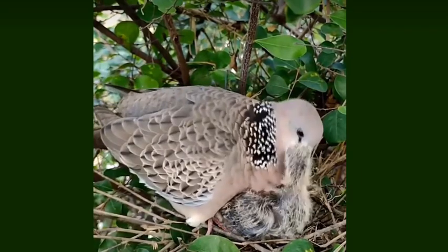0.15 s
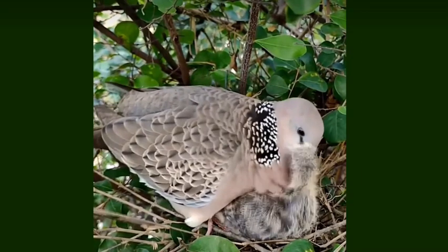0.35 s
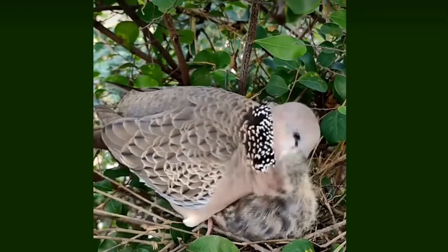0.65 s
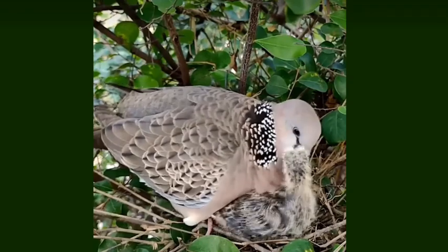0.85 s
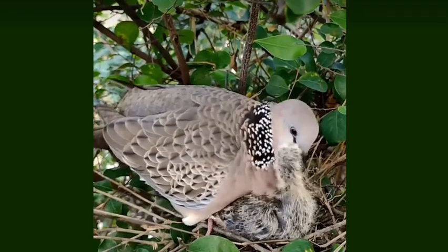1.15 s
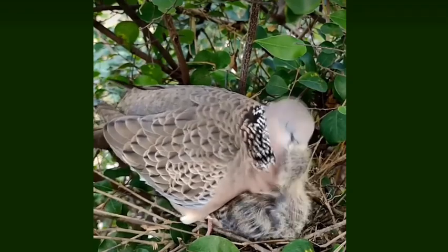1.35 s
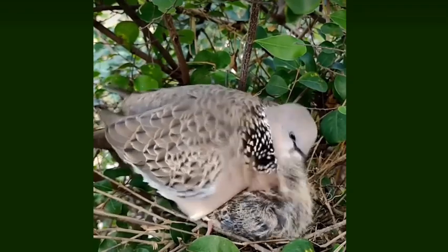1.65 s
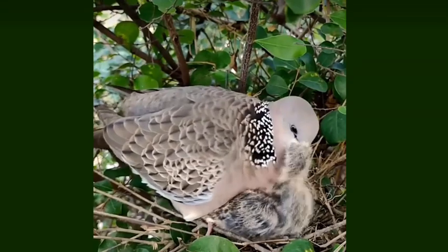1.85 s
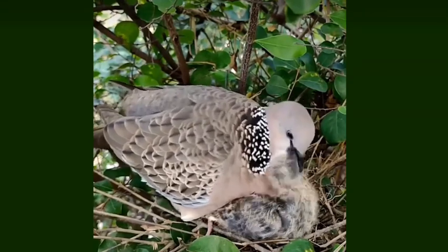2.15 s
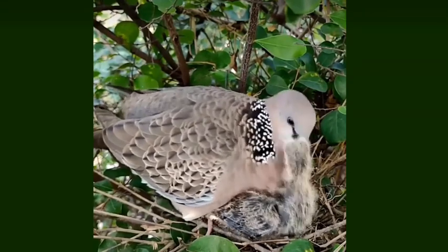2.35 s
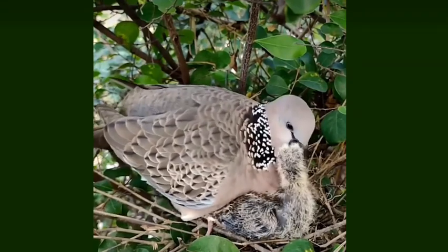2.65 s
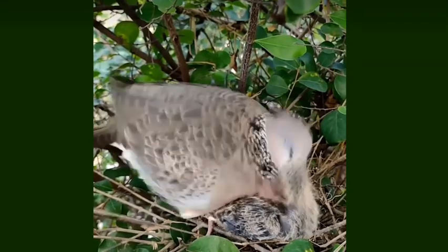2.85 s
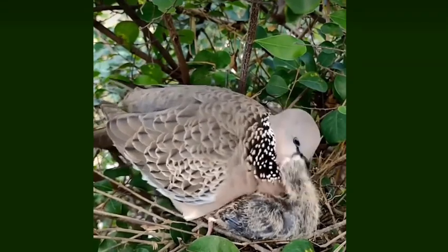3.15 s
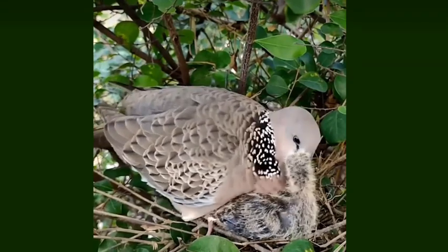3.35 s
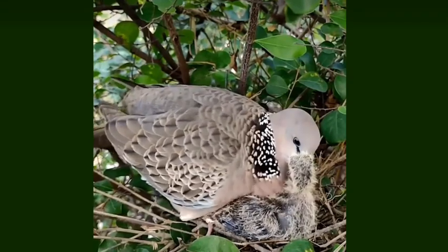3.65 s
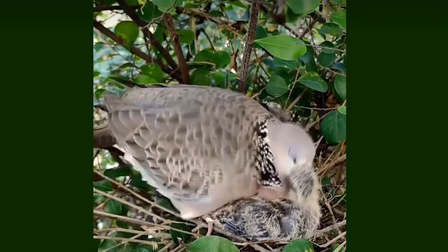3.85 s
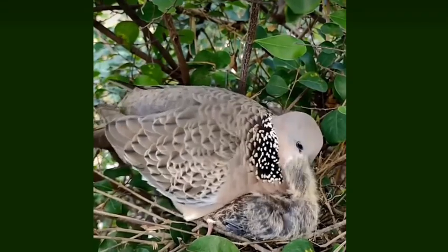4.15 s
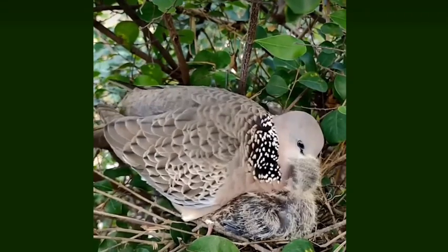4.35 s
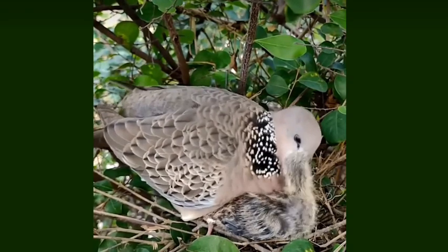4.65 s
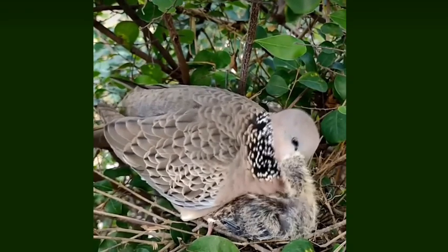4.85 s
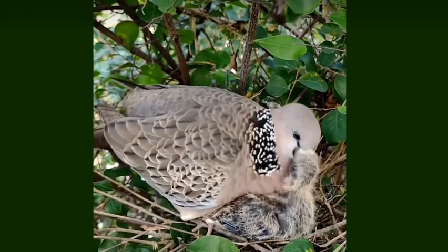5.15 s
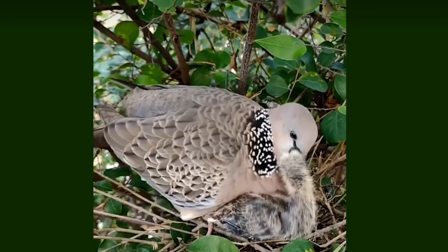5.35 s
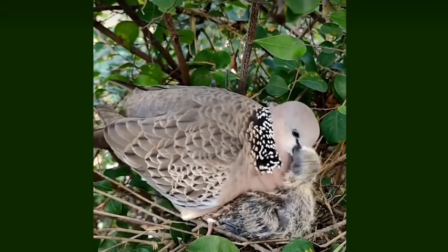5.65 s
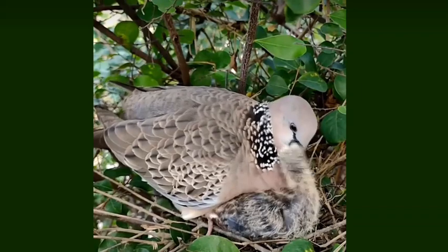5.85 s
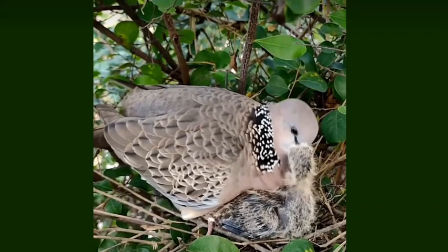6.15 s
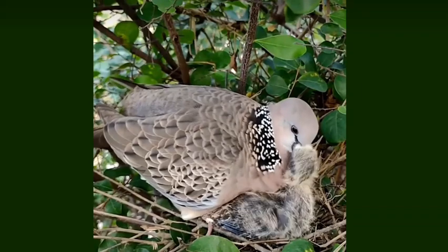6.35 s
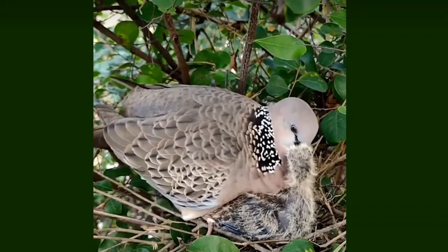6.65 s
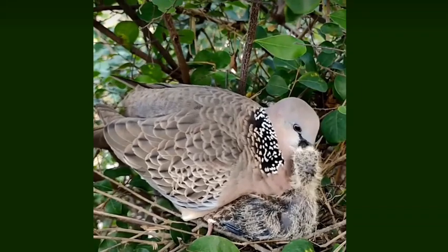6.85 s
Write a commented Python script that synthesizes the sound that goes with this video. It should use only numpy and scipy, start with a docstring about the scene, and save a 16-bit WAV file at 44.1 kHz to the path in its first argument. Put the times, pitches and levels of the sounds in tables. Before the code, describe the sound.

Several crickets shrill steadily close by in a leafy bush while a small bird gives buzzy, reedy chirps, a twig snaps, and low bumps knock the microphone.

```python
"""Several crickets shrill close by in a leafy bush where a dove feeds its chick: wing strokes ring the wings.
A small bird's reedy voice, shaped by its throat, gives buzzy chirps that swell and fade, and one squeak.
Other birds whistle in unsteady glides farther off, and one high note slurs down.
An even low patter and heavier bumps ring a few low cycles at the microphone; leaves and feathers brush
in grainy hiss; a twig snaps loudly once among fainter ticks, over low rumble and open air."""
import sys
import numpy as np
from scipy import signal
from scipy.fft import rfft, irfft, next_fast_len
from scipy.io import wavfile

SR = 44100
rng = np.random.default_rng(int(sys.argv[2]) if len(sys.argv) > 2 else 0)


def to_wav(sig):
    """Store sig (one row per channel, or 1-D mono) as 16-bit WAV at the path in sys.argv[1].

    Samples outside -1..1 are clipped; the rate is SR.
    """
    pcm = np.clip(np.atleast_2d(sig), -1, 1) * 32767
    pcm = np.round(pcm).astype(np.int16)
    wavfile.write(sys.argv[1], SR, pcm.T)  # frames by channels


N = 308687
TIME = np.arange(N) / SR
# chirps of the lowest cricket, with a long silence before the last: [t/s, length/s, relative level/dB]
LOW_CRICKET_CHIRPS = [(0.097, 0.174, -2.5), (0.429, 0.16, -1.5), (0.737, 0.17, -1.5), (1.054, 0.177, -1.5),
                      (1.395, 0.162, -0.5), (1.753, 0.14, 0), (2.047, 0.165, -1), (2.379, 0.153, -1),
                      (2.717, 0.138, -0.5), (5.473, 0.084, -3.5)]
LOW_STROKE_HZ = 116.6
# heavier bumps at the microphone, many in two flurries: [t/s, relative level/dB, nominal f/Hz]
MICROPHONE_BUMPS = [(.662, -29, 190), (1.601, -28, 195), (1.944, -24, 180), (2.031, -26, 178),
                    (2.284, -23, 174), (2.623, -28, 194), (2.711, -25.5, 171), (3.136, -30, 185),
                    (3.221, -25, 180), (3.391, -28, 186), (3.645, -27.5, 190), (4.134, -31.5, 169),
                    (4.248, -25.5, 158), (4.329, -25, 180), (4.588, -24.5, 182), (4.67, -23.5, 174),
                    (4.704, -22, 166), (4.754, -17, 171.5), (4.78, -21, 167), (4.821, -18.5, 171),
                    (4.843, -23, 171), (5.009, -27, 182), (5.093, -22.5, 180), (5.692, -21, 196),
                    (6.036, -18, 166), (6.07, -21, 174), (6.119, -17, 171), (6.147, -18.5, 165),
                    (6.191, -18.5, 179), (6.205, -15, 167), (6.232, -26, 181), (6.298, -18.5, 169),
                    (6.46, -19, 178), (6.728, -20.5, 162), (6.885, -21, 177)]


def gain_of(db):
    """Decibels to amplitude."""
    return 10 ** (np.asarray(db) / 20)


def evened(x):
    """Scales to rms 1."""
    return x / np.sqrt(np.mean(x ** 2) + 1e-20)


def read(points, hz):
    """Reads a spectrum on a log-frequency axis."""
    f, value = np.transpose(points)
    return np.interp(np.log(hz + 1), np.log(f + 1), value)


def colour(x, points):
    """Filters by a spectrum that falls away beyond its ends, then scales to rms 1."""
    size = next_fast_len(len(x))
    closed = [(points[0][0] * .8, -100), *points, (points[-1][0] * 1.2, -100)]
    gain = gain_of(read(closed, np.fft.rfftfreq(size, 1 / SR)))
    return evened(irfft(rfft(x, size) * gain, size)[:len(x)])


def wander(hz, size=N):
    """Smooth chance of about rms 1: straight lines between hz random values a second."""
    knots = rng.standard_normal(size // 20)
    return np.interp(np.arange(size) * hz / SR, np.arange(len(knots)), knots) * np.sqrt(3 / 2)


def add(mix, s, sound):
    """Mixes a sound in at time s."""
    part = mix[max(round(s * SR), 0):][:len(sound)]
    part += sound[:len(part)]


def rasp(x, share):
    """An unsteady voice: fast random tremor frays each pure line into a narrow band."""
    return x * (1 + share * wander(900)) / np.sqrt(1 + share ** 2)


def chirping(chirp_list, rise, fall, start_db):
    """Wing effort: each chirp starts a little soft, swells and stops; rise and fall in seconds."""
    effort = np.zeros(N)
    for start, length, db in chirp_list:
        t = np.arange(0, length + (rise + fall) / 2, 1 / SR)
        edges = np.minimum(t / rise, 1) * np.minimum((t[-1] - t) / fall, 1)
        add(effort, start - rise / 2, edges * gain_of(db + start_db * (1 - t / t[-1])))
    return effort


def cricket(effort, wing, level_db, stroke_hz, pulsed, unsteady, flutter_db):
    """Wing strokes pulse (the pulsed share of the power) over the scrape of file teeth; both ring the wing."""
    strokes = np.floor(np.cumsum(stroke_hz * (1 + unsteady * wander(30))) / SR)
    pulses = evened(np.diff(strokes, prepend=0))
    teeth = evened(1. * (rng.random(N) < 12000 / SR))  # 12000 random clicks a second
    clicks = np.sqrt(pulsed) * pulses + np.sqrt(1 - pulsed) * teeth
    drive = rng.choice([-1., 1.], N) * clicks
    return gain_of(level_db) * colour(drive * effort * gain_of(flutter_db * wander(45)), wing)


def loudest_cricket():
    """Chirps a little quicker than the highest one, with slow wing strokes and a gradual onset."""
    # chirps: [t/s, length/s, relative level/dB]
    mid_chirps = [(0, 0.11, 0), (0.278, 0.165, -1.5), (0.595, 0.171, 0.5), (0.906, 0.147, 0),
                  (1.195, 0.165, -0.5), (1.474, 0.18, -2.5), (1.775, 0.144, 0), (2.089, 0.15, -1),
                  (2.406, 0.12, -3.5), (2.787, 0.1, -2.5), (3.03, 0.12, -2), (3.305, 0.15, -1.5),
                  (3.606, 0.132, 0.0), (3.886, 0.165, -1.5), (4.232, 0.102, -1), (4.515, 0.174, -1.5),
                  (4.817, 0.15, -1.5), (5.121, 0.189, -1.5), (5.417, 0.16, -1), (5.74, 0.16, -0.5),
                  (6.018, 0.171, -2), (6.338, 0.168, 0), (6.643, 0.18, -0.5), (6.939, 0.054, -1.5)]
    # wing response: [f/Hz, level/dB]
    mid_wing = [(7400, -47.5), (7850, -10.5), (8150, -1), (8400, 3), (8620, 0.5), (8780, -21.5),
                (9050, -31), (9250, -67)]
    effort = chirping(mid_chirps, rise=.04, fall=0.013, start_db=-1.5)
    return cricket(effort, mid_wing, level_db=-30, stroke_hz=90.5, pulsed=.15, unsteady=0.06, flutter_db=0.55)


def highest_cricket():
    """Chirps three times a second, each stopping abruptly."""
    # chirps: [t/s, length/s, relative level/dB]
    high_chirps = [(0.119, 0.156, -1.5), (0.448, 0.189, -1.5), (0.769, 0.16, -1.0), (1.089, 0.168, -2),
                   (1.429, 0.183, 1), (1.77, 0.171, -3), (2.113, 0.162, 0.5), (2.415, 0.16, 1.5),
                   (2.749, 0.192, 0), (3.09, 0.168, 0), (3.412, 0.186, -3), (3.754, 0.18, -1),
                   (4.117, 0.147, -2), (4.432, 0.16, -0.5), (4.757, 0.189, -2), (5.1, 0.189, -1.5),
                   (5.449, 0.16, 0.5), (5.783, 0.168, -1), (6.123, 0.17, 1.5), (6.466, 0.165, -1.5),
                   (6.803, 0.15, -1.5)]
    # wing response: [f/Hz, level/dB]
    high_wing = [(7400, -45.5), (7950, -8), (8400, -2.5), (8600, -4), (8820, 2.5), (9020, -4.5),
                 (9130, -29.5), (9300, -74)]
    effort = chirping(high_chirps, rise=0.029, fall=0.0047, start_db=-2.5)
    return cricket(effort, high_wing, level_db=-32.0, stroke_hz=152, pulsed=.12, unsteady=0.035, flutter_db=0.5)


def throbbing():
    """Wing effort dips about fourteen times a second; now and then it rests longer or stresses a throb."""
    # running count of throbs: [t/s, throbs so far]
    throb_count = [(0, 0), (.279, 4), (.393, 6), (.689, 10), (1.382, 20), (1.648, 24), (2.057, 30),
                   (2.29, 33), (2.561, 37), (2.649, 38), (2.864, 41), (3.057, 44), (3.148, 45), (3.568, 51),
                   (3.784, 54), (3.948, 56), (4.065, 58), (4.148, 59), (4.347, 62), (4.72, 67), (4.83, 69),
                   (4.996, 71), (5.194, 74), (5.36, 76), (5.416, 77), (5.66, 80), (6.022, 85), (6.366, 90),
                   (6.455, 91), (6.585, 93), (6.745, 95), (7.02, 99)]
    # longer rests between runs of throbs: [t/s, nominal length/s, level change/dB]
    rests = [(1.645, 0.079, -0.5), (1.986, 0.077, -0.5), (2.293, 0.02, -13), (2.641, 0.033, -13),
             (2.931, 0.026, -3), (3.003, 0.031, -1), (3.275, 0.017, -7.5), (3.499, 0.029, -9),
             (3.843, 0.02, -11), (4.351, 0.01, -6.5), (4.989, 0.025, -11), (5.354, 0.035, -12),
             (5.66, 0.019, -6), (6.015, .044, -10.5)]
    # stressed throbs: [t/s, nominal length/s, level change/dB]
    accents = [(1.336, .04, 4), (2.789, .05, 5.5), (2.898, 0.04, 1.5), (3.314, .016, 3.5),
               (4.051, 0.023, 5.5), (4.109, 0.0094, 7), (4.333, 0.0092, 5), (4.437, .01, 3.5),
               (4.462, 0.02, 5.5), (4.67, 0.012, 3.5), (4.758, .03, 2.5), (4.957, 0.028, 3),
               (5.018, .014, 2.5), (5.1, 0.034, 3.5), (5.24, .022, 4), (5.77, .022, 3), (6.32, .016, 0),
               (6.622, 0.028, 4)]
    rest_db = -7.5
    turn = np.interp(TIME, *np.transpose(throb_count)) % 1  # position within a throb
    db = np.interp(turn, [0, .17, .27, .64, 1], [rest_db, rest_db, 0, 0, rest_db])
    for s, length, change_db in rests + accents:
        bump = signal.windows.tukey(round(length * 4 / 3 * SR), .5)
        add(db, s - length * 2 / 3, change_db * bump)
    return gain_of(db)


def throbbing_cricket():
    """A fourth cricket throbs on and on."""
    # wing response: [f/Hz, level/dB]
    throb_wing = [(6650, -67), (6850, -33.5), (7150, -21.5), (7360, 0.5), (7650, 6.5), (8100, 4),
                  (8300, -0.5), (8600, -25), (9050, -33.5), (9250, -65.5)]
    return cricket(throbbing(), throb_wing, level_db=-31, stroke_hz=126.1, pulsed=.14,
                   unsteady=0.082, flutter_db=-0.37)


def lowest_cricket():
    """Strongly pulsed chirps on a narrow wing resonance."""
    # wing response: [f/Hz, level/dB]
    low_wing = [(6500, -86), (6950, -17.5), (7120, -4), (7235, 4), (7290, -5.5), (7390, 11.5), (7480, -1.5),
                (7560, -19.5), (7900, -38.5)]
    effort = chirping(LOW_CRICKET_CHIRPS, rise=0.018, fall=0.019, start_db=-0.5)
    return cricket(effort, low_wing, level_db=-38.5, stroke_hz=LOW_STROKE_HZ, pulsed=.75,
                   unsteady=0.018, flutter_db=0.0)


def wing_ring():
    """A clear tone builds up in each chirp of the lowest cricket and trills near its wing-stroke rate."""
    ring_hz, ring_db, swell_s = 7418, -33.5, 0.033
    effort = np.zeros(N)
    for start, length, db in LOW_CRICKET_CHIRPS:
        t = np.arange(0, length, 1 / SR)
        edges = np.minimum(t / swell_s, 1) ** 2 * np.minimum((length - t) / 0.01, 1)
        add(effort, start, gain_of(db) * edges)
    stroke = 2 * np.pi * np.cumsum(LOW_STROKE_HZ * (1 + 0.025 * wander(28))) / SR
    trill = 1 + .45 * (np.cos(stroke) + np.cos(2 * stroke) / 2)
    phase = 2 * np.pi * np.cumsum(ring_hz * (1 + .0012 * wander(60))) / SR
    return gain_of(ring_db + 1.8 * wander(50)) * effort * evened(trill * np.sin(phase))


def far_crickets():
    """A far chorus as gently flickering coloured noise, with a steady thin shrill above it."""
    # spectrum of the chorus: [f/Hz, level/dB]
    far_chorus = [(6900, -38), (7300, -17), (7900, 8.5), (8500, 6), (8800, -6.5), (9030, -4), (9130, -31.5),
                  (9260, -68.5)]
    chorus = gain_of(-40) * colour(rng.standard_normal(N), far_chorus) * gain_of(1.5 * wander(7.8))
    shrill_band = [(13200, -27), (13700, 0), (14150, 15.5), (14500, -16)]  # [f/Hz, level/dB]
    shrill = gain_of(-76.5) * colour(rng.standard_normal(N), shrill_band)
    return chorus + shrill


def crickets():
    """Three chirping crickets drift in and out of step over a throbbing one and the far crickets."""
    chirpers = highest_cricket() + loudest_cricket() + lowest_cricket() + wing_ring()
    return chirpers + throbbing_cricket() + far_crickets()


def background():
    """Low rumble under the wash of open air, both coloured noise."""
    # level of the rumble before its swing is widened: [t/s, level/dB]
    rumble_level = [(0.0, -58), (0.53, -53), (1.73, -55), (2.09, -47.5), (3.82, -51), (4.19, -46),
                    (4.52, -50.5), (4.74, -40), (4.99, -46), (5.77, -46.5), (6.24, -39), (6.49, -44),
                    (7.0, -46)]
    # spectrum of the rumble: [f/Hz, level/dB]
    rumble_colour = [(30, -58), (65, -52), (100, -34.5), (130, -9), (155, -0.5), (200, -4), (260, -9.5),
                     (350, -30), (600, -51.5)]
    # spectrum of the air: [f/Hz, level/dB]
    air_colour = [(60, -56.5), (150, 3.5), (300, 5.5), (600, 0.5), (1100, -4), (2000, -2.5), (2900, -7),
                  (3700, -16.5), (5400, -15.5), (6400, -22), (9500, -25), (12000, -22), (15500, -37.5)]
    pivot_db, swing = -45, 1.1  # the rumble swells and sinks about the pivot
    swell_db = swing * (np.interp(TIME, *np.transpose(rumble_level)) - pivot_db)
    rumble = gain_of(pivot_db + swell_db + 0.9) * colour(rng.standard_normal(N), rumble_colour)
    air = gain_of(-54.5) * colour(rng.standard_normal(N), air_colour) * gain_of(0.89 * wander(9.7))
    return rumble + air


def whistles(jitter):
    """Other birds' short glides: sine tones with a slightly unsteady pitch."""
    # notes: [t/s, length/s, level/dB, first f/Hz, last f/Hz]
    notes = [(0.008, 0.049, -48, 3200, 2880), (0.208, 0.023, -55.5, 3070, 3040),
             (0.333, 0.035, -48, 2760, 2690), (1.087, 0.074, -53.5, 2996, 2830),
             (1.264, 0.052, -45.5, 2515, 2223), (1.309, 0.037, -52.5, 2440, 2400),
             (1.45, 0.041, -52.5, 2095, 1990), (2.092, 0.027, -49, 846, 810),
             (2.167, 0.012, -42.5, 610, 507), (2.931, 0.02, -43, 1936, 1717),
             (4.093, 0.024, -50.5, 2610, 2490), (4.274, 0.062, -52.5, 2106, 1970),
             (4.423, 0.037, -48, 3020, 2830), (4.444, 0.016, -49, 2500, 2630),
             (4.452, 0.024, -58, 4370, 4630), (4.482, 0.021, -48.5, 3330, 3330),
             (4.502, 0.035, -55, 5240, 5300), (4.662, 0.025, -57, 6000, 5950),
             (4.799, .025, -55, 2610, 2550), (4.908, 0.06, -56, 5600, 5450),
             (5.063, 0.019, -58, 2800, 2720), (5.55, .025, -58, 2080, 2040),
             (5.699, 0.022, -59.5, 2320, 2300), (5.795, 0.037, -58, 1670, 1690),
             (5.749, 0.033, -55, 2030, 2005), (5.985, 0.016, -47, 1860, 1870),
             (6.013, 0.026, -48.5, 1876, 1860), (6.185, 0.025, -51.5, 670, 700),
             (6.551, 0.019, -48, 692, 670), (6.454, .04, -56, 10200, 9900), (6.53, 0.026, -56, 3155, 3110),
             (6.63, 0.037, -54, 5500, 5280), (6.778, .025, -57.5, 1600, 1690),
             (6.889, 0.03, -55.5, 2990, 2950)]
    out = np.zeros(N)
    for s, length, db, first_hz, last_hz in notes:
        hz = np.linspace(first_hz, last_hz, round(length * SR))
        hz = hz * (1 + jitter * wander(400, size=8192)[:len(hz)])
        tone = np.sqrt(2) * np.sin(2 * np.pi * np.cumsum(hz) / SR)
        add(out, s, gain_of(db) * tone * signal.windows.tukey(len(hz), .8))
    return out


def patter(detune):
    """Evenly spaced knocks (s, dB, Hz), nearly twelve a second, deeper when louder, each a little different."""
    # strength of the patter: [t/s, relative level/dB]
    patter_level = [(0, -36), (1.8, -36.5), (2.1, -29), (3.9, -35), (4.3, -28.5), (4.8, -29.5), (5.4, -27),
                    (6.2, -30.5), (7, -25.5)]
    start_s, step_s = .0635, .08533
    full_hz, full_db = 175, -26  # nominal pitch at full strength
    soft_rise_hz_per_db = 2.5  # softer knocks ring higher
    spread_db, merge_s = 1.5, .025  # chance in level; a knock this close to a bump is left to the bump
    s = np.arange(start_s, N / SR, step_s)
    strength, pitch = rng.standard_normal((len(s), 2)).T
    db = np.interp(s, *np.transpose(patter_level))
    hz = full_hz + soft_rise_hz_per_db * (full_db - db)
    knocks = zip(s, db + spread_db * strength, hz * (1 + detune * pitch))
    return [knock for knock in knocks
            if all(abs(knock[0] - bump[0]) > merge_s for bump in MICROPHONE_BUMPS)]


def thumps(rise, sag, level_db, body_hz, body_db, lowcut_hz):
    """Each knock or bump rings a few low cycles that sag in pitch and leaves a faint resonant boom."""
    t, out = np.arange(4000) / SR, np.zeros(N)
    for s, db, hz in patter(detune=0.034) + MICROPHONE_BUMPS:
        turns = np.cumsum(hz * (1 + sag * (np.exp(-t / 0.011) - .35))) / SR
        swell = (t / rise * np.exp(1 - t / rise)) ** 2
        add(out, s, gain_of(db + level_db) * swell * np.sin(2 * np.pi * (turns + rng.random())))
    boom = signal.lfilter(*signal.iirpeak(body_hz, 14, fs=SR), out)
    lowcut = signal.butter(N=4, Wn=lowcut_hz, btype="high", fs=SR, output="sos")
    return signal.sosfilt(lowcut, out + gain_of(body_db) * boom)


def brushes(grain_db, dull_db):
    """Grainy hiss that swells and dies as leaves and feathers brush past; light touches are duller."""
    # brushing: [t of the peak/s, half length/s, level/dB]
    strokes = [(0.718, 0.017, -29.5), (0.79, .04, -64), (1.35, 0.025, -48), (3.185, 0.035, -52),
               (3.606, 0.0095, -53), (4.43, 0.0047, -44), (4.764, 0.046, -60), (5.952, 0.026, -54),
               (6.25, 0.068, -65), (6.47, 0.017, -55.5), (6.763, .02, -60)]
    # spectrum of the hiss: [f/Hz, level/dB]
    brush_colour = [(2000, -26), (4500, -23.5), (6000, -6), (8000, 0), (11000, -13), (14000, -3.5),
                    (16000, -12.5)]
    push = sum(gain_of(db) / np.cosh(np.clip((TIME - s) / half, -20, 20)) ** 2 for s, half, db in strokes)
    hiss = colour(rng.standard_normal(N) * gain_of(grain_db * wander(900)), brush_colour)
    soft = signal.sosfiltfilt(signal.butter(N=6, Wn=10800, fs=SR, output="sos"), hiss)
    treble_gain = gain_of(dull_db * (1.0 - push / push.max()))
    return push * (soft + (hiss - soft) * treble_gain)


def chirps(rasp_db):
    """A reedy voice near 450 Hz turns hoarse; the throat favours a few of its fourth to eighth harmonics."""
    # buzzy chirps: [t/s, length/s, level/dB, first f/Hz, turning f/Hz, last f/Hz, throat resonance f/Hz]
    calls = [(1.184, 0.033, -51, 442, 422, 455, 2960), (1.408, 0.063, -53.5, 462, 437, 478, 2970),
             (1.462, 0.076, -55.5, 426, 416, 401, 2780), (1.651, 0.041, -51, 414, 419.5, 414, 2900),
             (1.699, 0.031, -50.5, 423, 415, 420, 2640), (1.749, 0.071, -52, 403, 430, 435, 3000),
             (1.951, 0.034, -43, 444, 419, 424, 2820), (2.135, 0.084, -41, 449.5, 435, 422, 2890),
             (2.326, 0.083, -36, 450, 435, 450, 2880), (2.512, 0.073, -34, 450, 450, 486, 2530),
             (2.693, 0.078, -32, 504, 450.4, 460.5, 2584), (2.884, 0.083, -29.5, 493, 459, 479, 2605),
             (3.064, 0.061, -31.5, 488, 467, 460.5, 2720), (3.222, 0.089, -32.5, 490, 454, 448, 2790),
             (3.413, 0.059, -32, 511, 467.6, 452, 2820), (3.604, 0.058, -38, 500, 447, 493, 2840),
             (3.798, 0.056, -38.5, 498, 451, 491, 2820), (3.988, 0.048, -45.5, 442, 438, 426, 3010),
             (4.213, 0.054, -49, 423, 437, 429, 2720)]
    # a chirp breaks up as it goes: [share of the chirp, noisy share of the power]
    hoarse_curve = [(0, 0), (.35, .02), (.55, .22), (1, .3)]
    # loudness shape: [share of the chirp, amplitude]
    swell_curve = [(0, 0), (.07, .65), (.3, .8), (.6, 1), (.85, .7), (1, 0)]
    pitch_turn = 0.405  # share of a chirp at which the pitch turns
    throat_width_hz, narrow_start = 350, 0.42  # narrow at first: a slur that widens into a buzz
    hoarse_width_hz = 400
    out = np.zeros(N)
    for s, length, db, first_hz, middle_hz, last_hz, throat_hz in calls:
        u = np.linspace(0, 1, round(length * SR))
        hz = np.interp(u, [0, pitch_turn, 1], [first_hz, middle_hz, last_hz])
        hz = hz * (1 + .006 * wander(500, size=8192)[:len(u)])
        phase = 2 * np.pi * np.cumsum(hz) / SR
        width = throat_width_hz * np.interp(u, [0, .6], [narrow_start, 1])
        centre = throat_hz * hz / middle_hz  # the resonance slides with the pitch
        voice, frayed = np.zeros(len(u)), np.zeros(len(u))
        for k in range(4, 9):
            offset_hz = k * hz - centre
            tremor = gain_of(rasp_db * wander(150.0, size=8192)[:len(u)])
            throat = 1 / (1 + (offset_hz / width) ** 2 / 2) ** 2
            voice += np.sin(k * phase + 2 * np.pi * rng.random()) * tremor * throat
            noisy = wander(300, size=8192)[:len(u)] * np.exp(-(offset_hz / hoarse_width_hz) ** 2 / 2)
            frayed += np.sin(k * phase + 2 * np.pi * rng.random()) * noisy
        hoarse = np.interp(u, *np.transpose(hoarse_curve))
        swell = np.interp(u, *np.transpose(swell_curve))
        blend = np.sqrt(1 - hoarse) * evened(voice) + np.sqrt(hoarse) * evened(frayed)
        add(out, s, gain_of(db) * swell * blend)
    return out


def snaps(rise):
    """A crack of about a millisecond: most twig modes die at once, two ring on faintly, and fibres crackle."""
    # snaps and ticks: [t/s, level/dB, centre f/Hz]
    cracks = [(1.942, -34.5, 3130), (2.33, -47, 3260), (3.111, -43, 3140), (4.3301, -12.5, 1777),
              (4.434, -35, 1800), (4.749, -35, 5100), (6.322, -37, 2500)]
    # modes of a twig: [multiple of the centre pitch, level/dB, t60/s]
    twig_modes = [(.85, -7.5, .008), (1.03, -5.5, .009), (1.25, -30, .007), (1.85, -20.5, .01),
                  (2.9, -33, 0.008), (.9, -29, .16), (1.1, -31, .2)]
    splinter_db, splinter_t60_s, splinters_per_s = -20, 0.23, 310
    t, out = np.arange(8000) / SR, np.zeros(N)
    for s, db, hz in cracks:
        ring = sum(gain_of(mode_db - 60 * np.maximum(t - rise, 0) / t60)
                   * np.sin(2 * np.pi * ratio * hz * (t - rise)) for ratio, mode_db, t60 in twig_modes)
        crack = ring * np.minimum(t / rise, 1) ** 2
        fibres = rng.standard_normal(len(t)) * (rng.random(len(t)) < splinters_per_s / SR)
        fibres = fibres * gain_of(splinter_db - 60 * t / splinter_t60_s)
        bright_crack = np.diff(crack) * SR / (2 * np.pi * hz)  # differentiation lifts the treble
        crackle = signal.fftconvolve(bright_crack, fibres)[:len(t)]
        add(out, s, gain_of(db) * (crack + crackle))
    return out


def squeak():
    """One sharp arched note carried by its fourth and fifth harmonics, with a faint sixth."""
    # course of the note: [t/s, fundamental f/Hz, level/dB]
    arch_path = [(3.340, 685, -53), (3.350, 742, -41.5), (3.36, 874, -49), (3.376, 920, -32),
                 (3.38, 810, -36.5), (3.388, 855, -48)]
    s, pitch, db = np.transpose(arch_path)
    t, out = np.arange(s[0], s[-1], 1 / SR), np.zeros(N)
    phase = 2 * np.pi * np.cumsum(np.interp(t, s, pitch)) / SR
    voice = np.sin(4 * phase) + np.sin(5 * phase) + np.sin(6 * phase) / 10
    add(out, s[0], gain_of(np.interp(t, s, db)) * voice)
    return out


def slur(jitter):
    """A high, unsteady whistle that swells quickly, lingers, then fades as it slides down."""
    # course of the slur: [t/s, f/Hz, level/dB]
    slur_path = [(6.173, 7200, -49), (6.193, 6750, -28.5), (6.213, 6400, -33), (6.228, 6050, -43),
                 (6.245, 5730, -38), (6.262, 5300, -52)]
    s, pitch, db = np.transpose(slur_path)
    t, out = np.arange(s[0], s[-1], 1 / SR), np.zeros(N)
    hz = np.interp(t, s, pitch) * (1 + jitter * wander(460, size=8192)[:len(t)])
    tone = np.sqrt(2) * np.sin(2 * np.pi * np.cumsum(hz) / SR)
    add(out, s[0], gain_of(np.interp(t, s, db)) * tone)
    return out


def garden(x):
    """Sparse reflections from leaves and surroundings, each band dying at its own speed."""
    # decay time of the echo: [f/Hz, t60/s]
    echo_t60 = [(200, .15), (1500, .3), (3000, .32), (6000, .24), (15000, .15)]
    taps = rng.choice([-1., 1.], SR // 2) * (rng.random(SR // 2) < 4000 / SR)
    taps[:300] = 0  # nearly 7 ms before the first reflection
    hz, t, z = signal.stft(taps, SR, nperseg=256)
    decay = gain_of(-60 * t / read(echo_t60, hz)[:, None])
    tail = signal.istft(z * decay, SR, nperseg=256)[1]
    return signal.fftconvolve(x, tail / np.linalg.norm(tail))[:N]


def scene():
    """Near sounds are nearly dry; the far birds and the brushing send more to the echo."""
    insects = crickets()
    far_birds = rasp(whistles(jitter=.009) + slur(jitter=.014), share=.3)
    low = thumps(rise=0.0069, sag=0.26, level_db=-3.0, body_hz=151.3, body_db=-3.0, lowcut_hz=155)
    leaves = brushes(grain_db=2.0, dull_db=-12.0)
    throat_top = signal.butter(N=12, Wn=3380, fs=SR, output="sos")  # the throat trims the top harmonics
    near_bird = signal.sosfilt(throat_top, rasp(chirps(rasp_db=4.0), share=0.18))
    twig_lowcut = signal.butter(N=5, Wn=1250, btype="high", fs=SR, output="sos")
    twigs = signal.sosfilt(twig_lowcut, snaps(rise=0.00083))
    arch = rasp(squeak(), share=0.089)
    bird_send = gain_of(-14.0) * near_bird + gain_of(-12.0) * arch + gain_of(-8.0) * far_birds
    bush_send = gain_of(-12.5) * twigs + gain_of(-5.5) * leaves + gain_of(-13) * insects
    echo = garden(bird_send + bush_send)
    return (insects + near_bird + arch + far_birds + leaves + twigs + echo + low + background())[None]


def record(dry):
    """The recorder's band limit: a steep low-pass."""
    edge_hz = 15750
    return signal.oaconvolve(dry, signal.firwin(511, edge_hz, window=("kaiser", 9), fs=SR)[None], "same")


dry = scene()
out = record(dry)
to_wav(out)
```